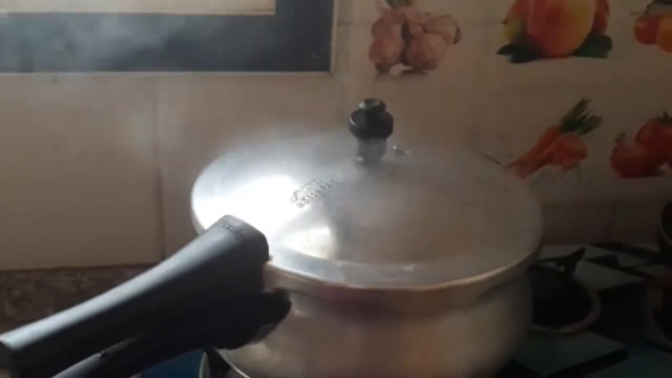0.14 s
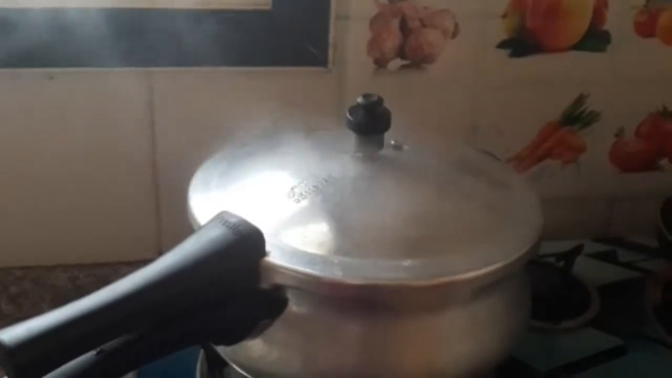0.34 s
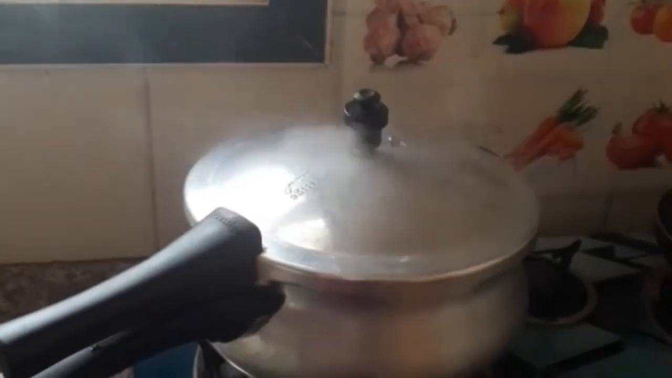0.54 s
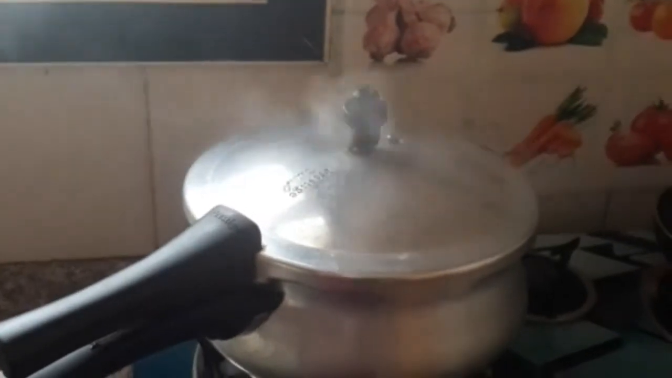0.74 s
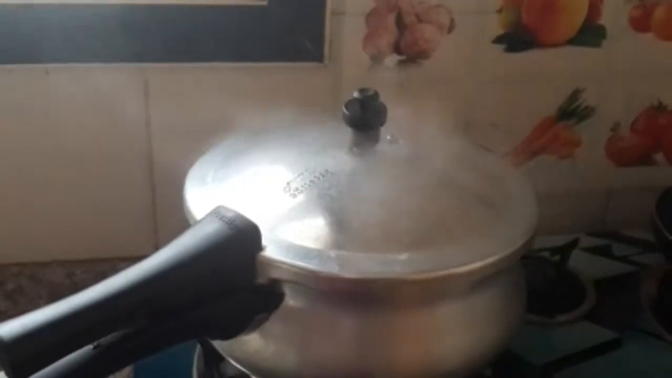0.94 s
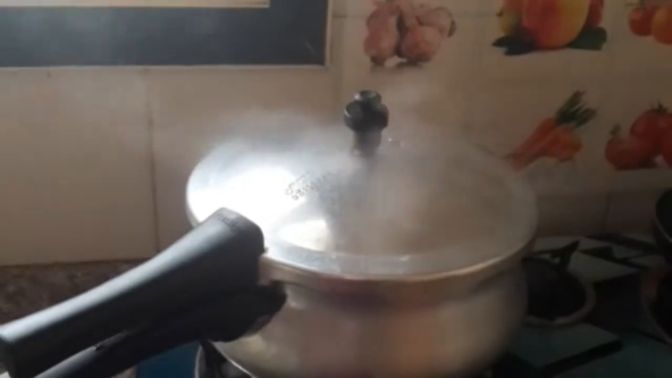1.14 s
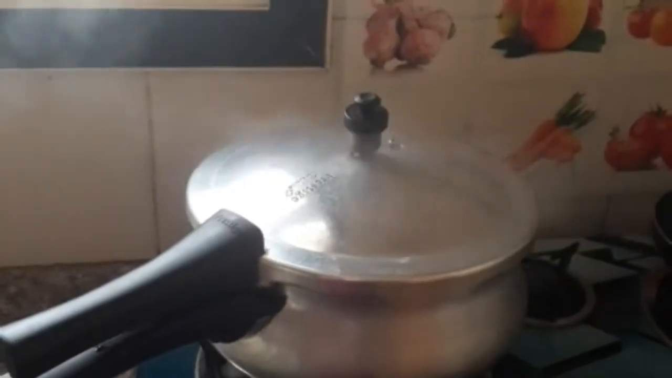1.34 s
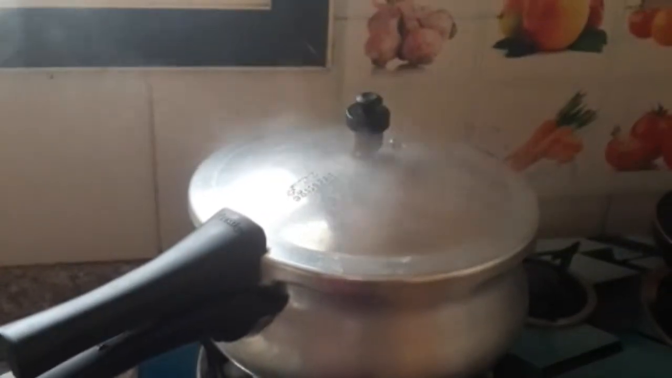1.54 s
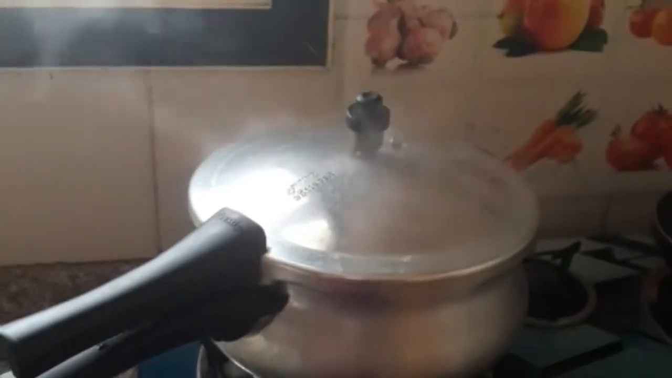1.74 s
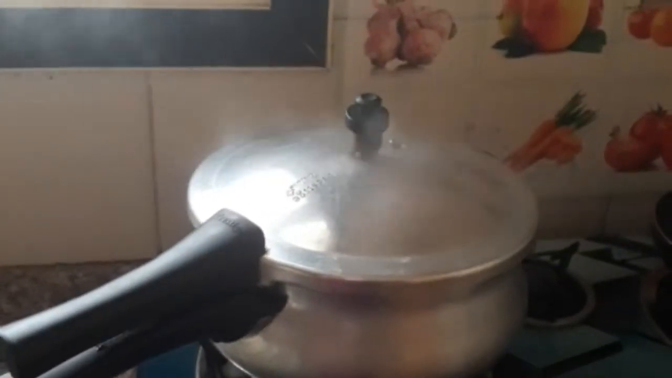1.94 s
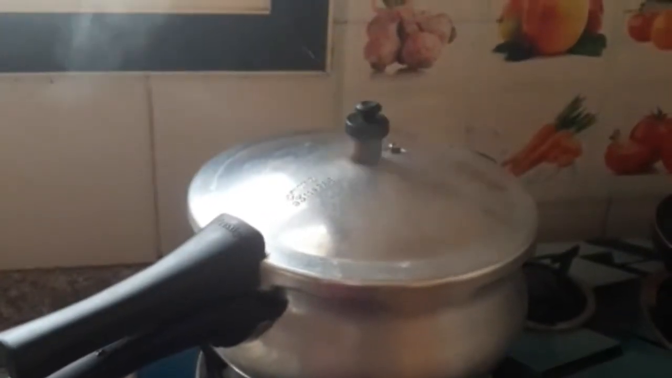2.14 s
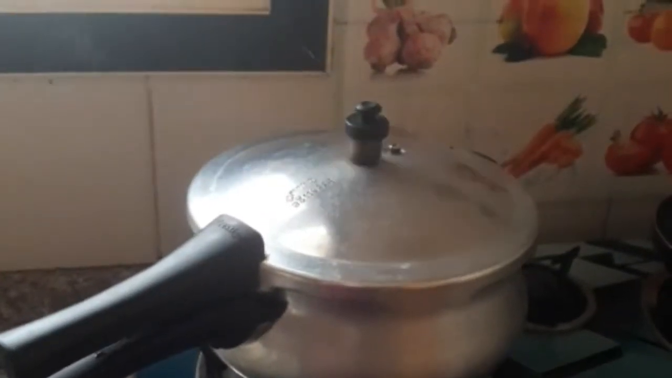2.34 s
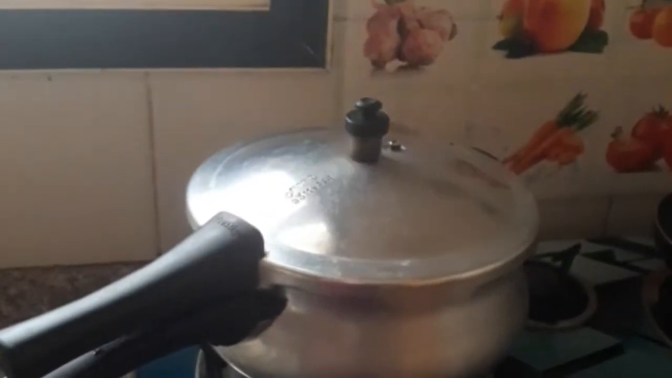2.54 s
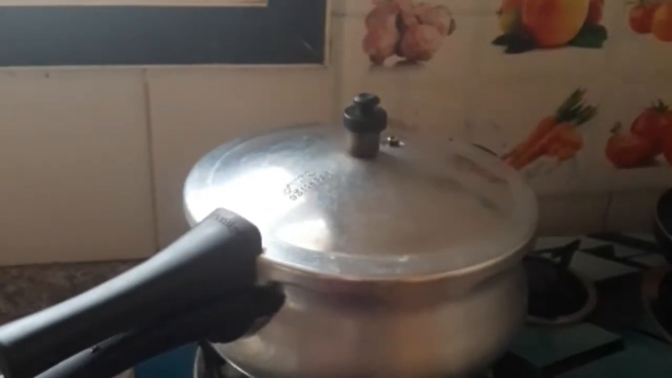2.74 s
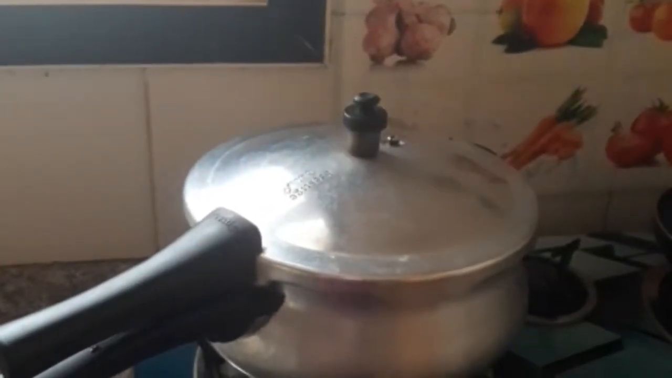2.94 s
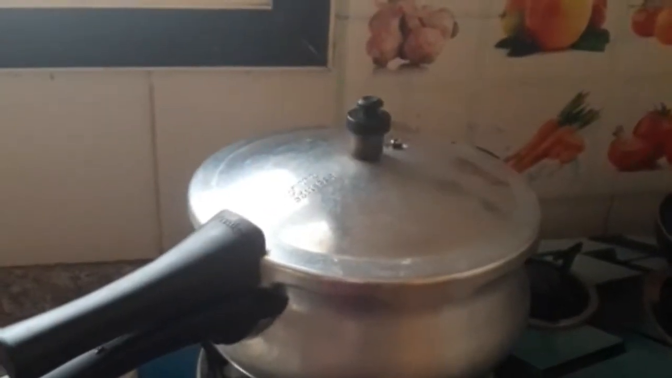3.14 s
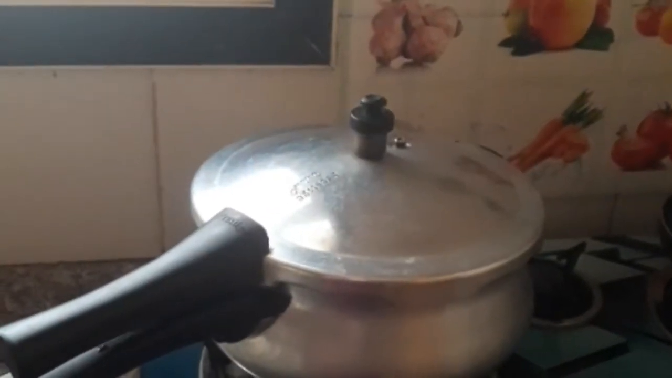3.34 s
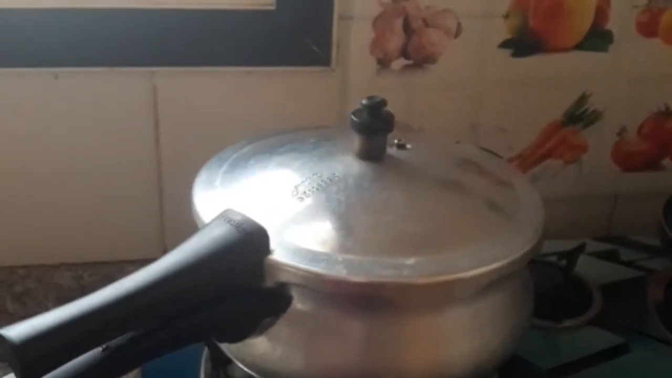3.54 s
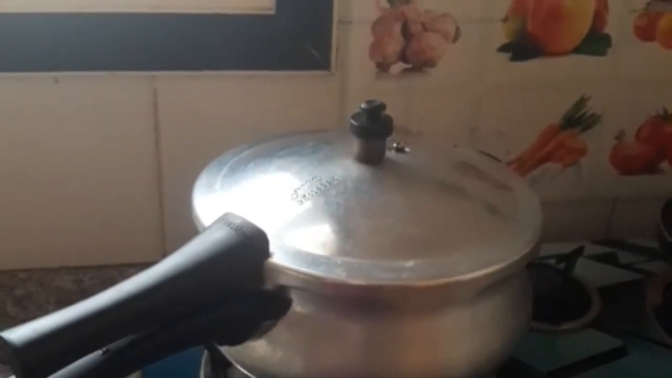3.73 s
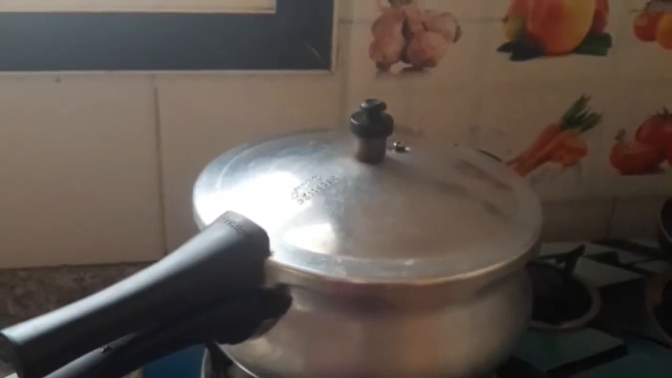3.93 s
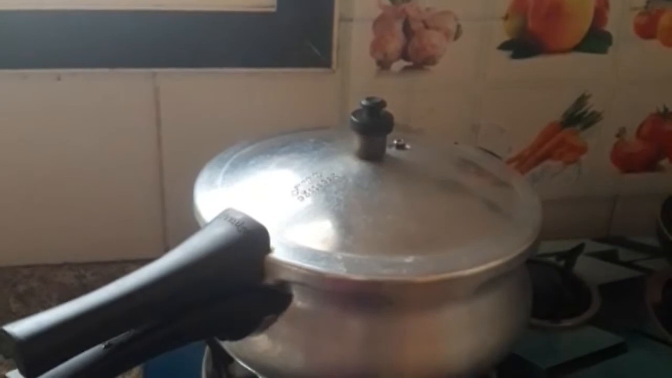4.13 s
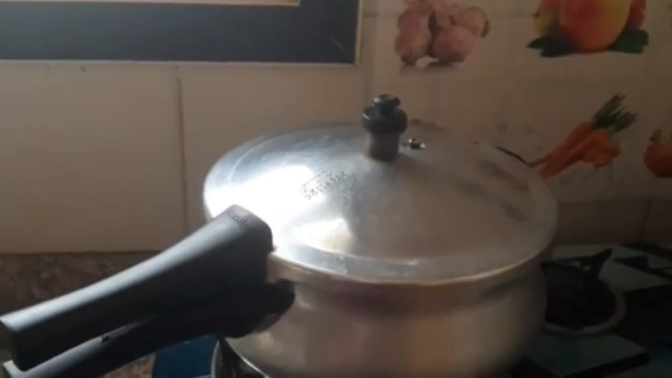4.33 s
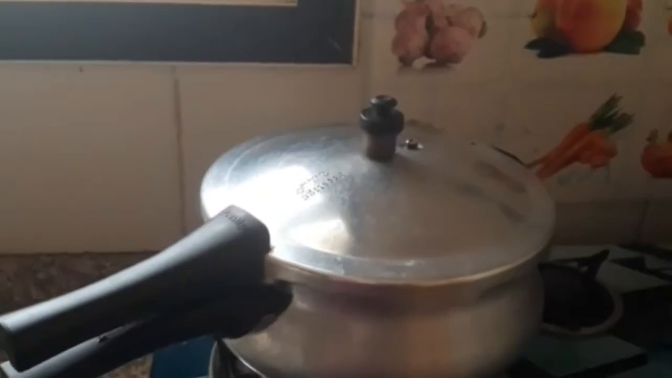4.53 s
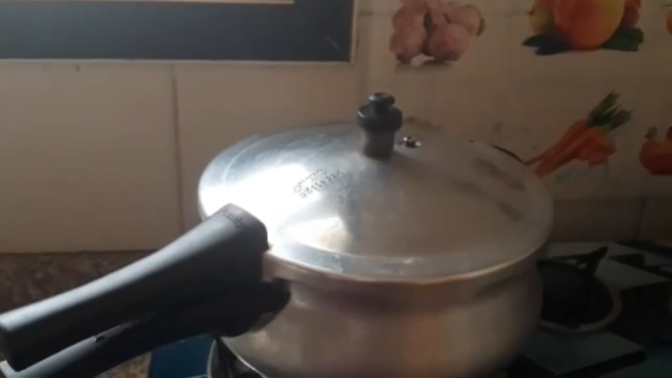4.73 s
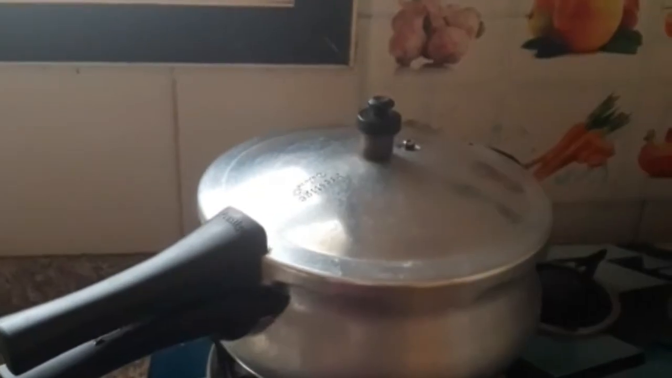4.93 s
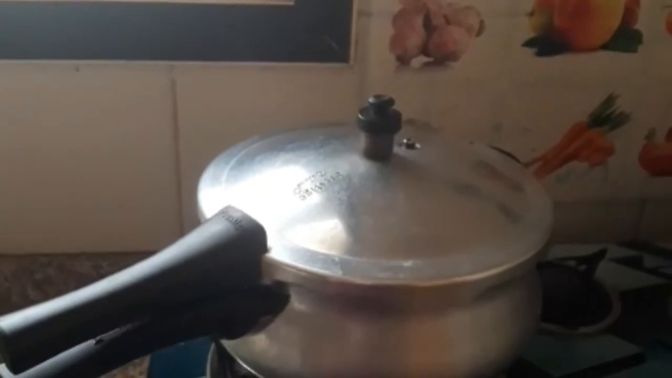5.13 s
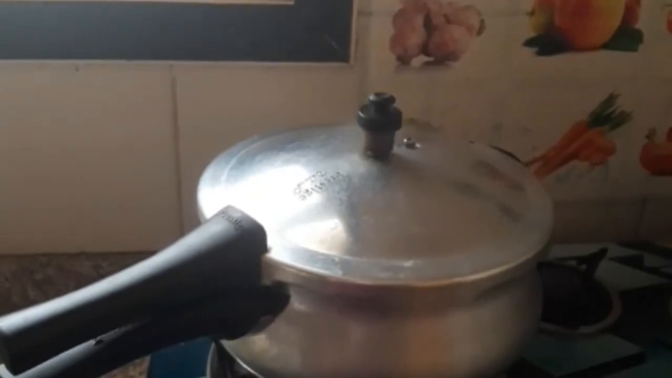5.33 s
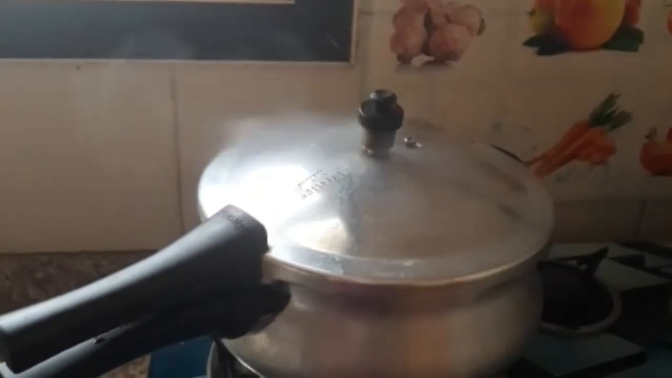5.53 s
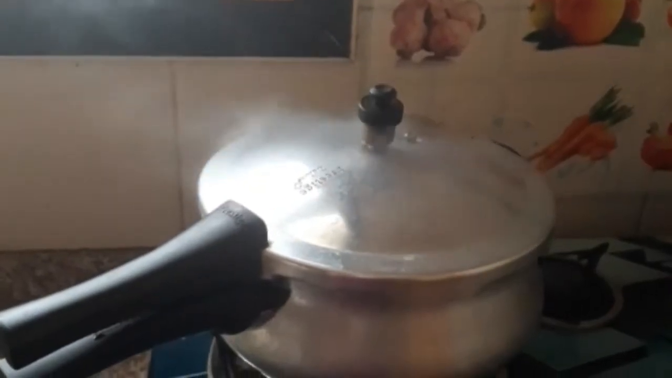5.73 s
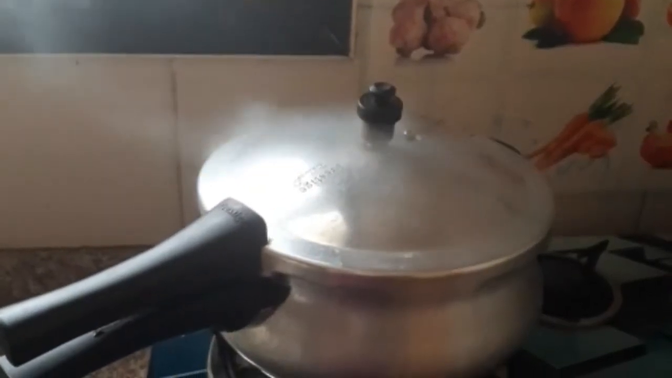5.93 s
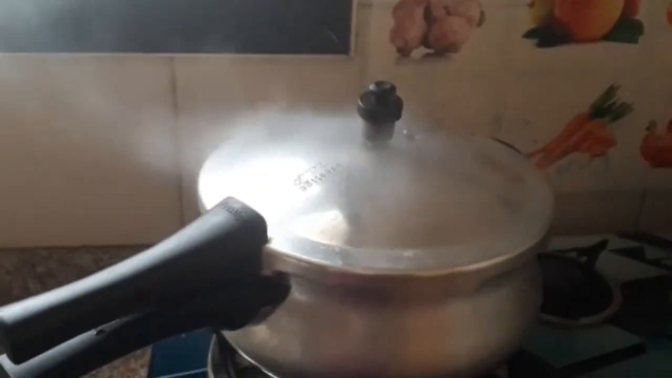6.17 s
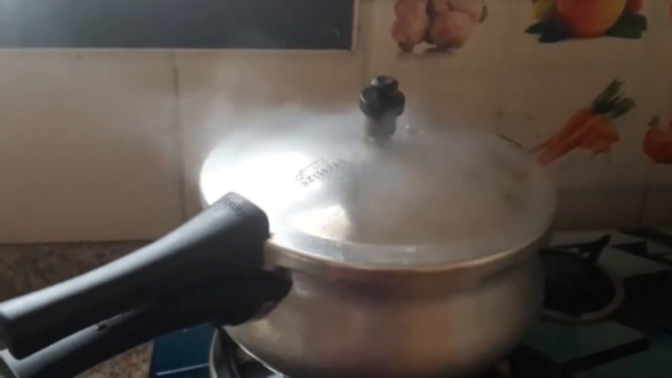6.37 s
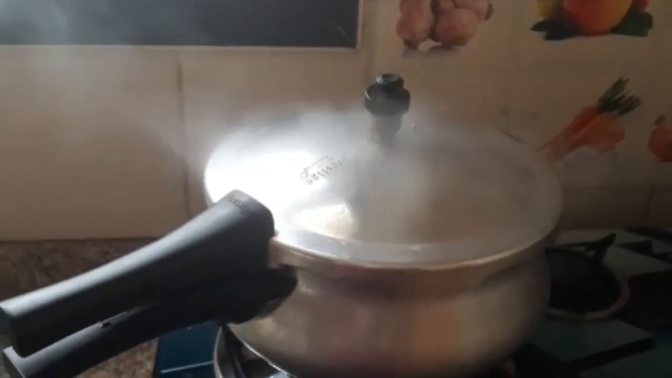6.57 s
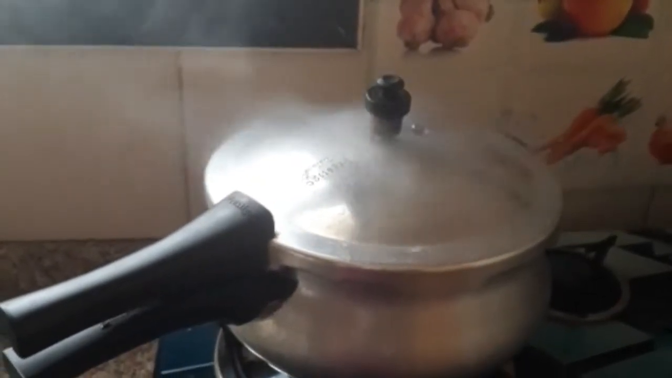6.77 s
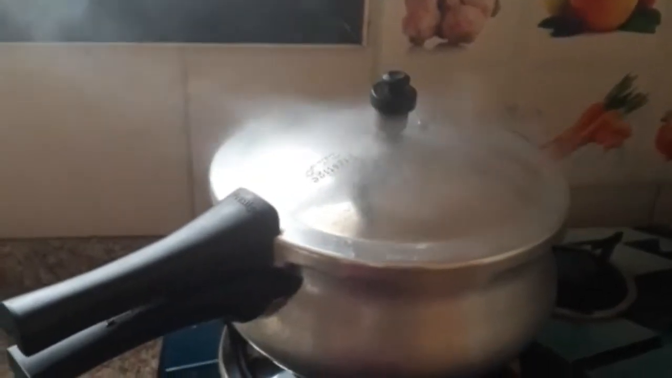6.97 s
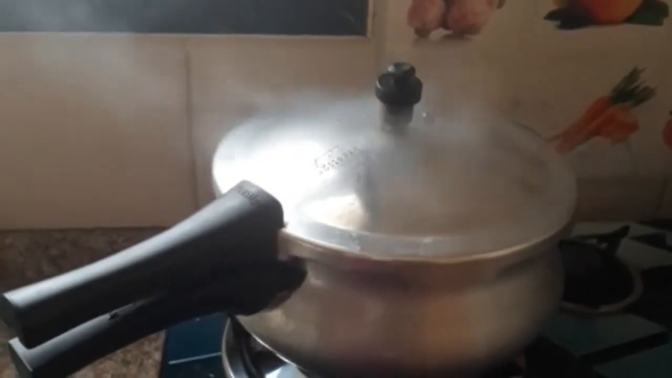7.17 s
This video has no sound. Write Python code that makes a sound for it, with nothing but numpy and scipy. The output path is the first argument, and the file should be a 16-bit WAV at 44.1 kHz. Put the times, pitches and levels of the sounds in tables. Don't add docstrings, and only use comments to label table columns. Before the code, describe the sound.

A pressure cooker roars steam in a harsh bright hiss, its weight clinks shut, a quiet simmer follows, then steam blasts out again.

```python
import sys
import numpy as np
from scipy import signal
from scipy.fft import rfft, irfft
from scipy.io import wavfile
from scipy.ndimage import uniform_filter1d

SR = 44100
rng = np.random.default_rng(int(sys.argv[2]) if len(sys.argv) > 2 else 0)


def wav_out(sig):
    wavfile.write(sys.argv[1], SR, np.round(np.clip(np.atleast_2d(sig).T, -1, 1) * 32767).astype(np.int16))


def linear_from_db(decibels):
    return 10 ** (np.asarray(decibels, float) / 20)


N = 317520
HZ = np.fft.rfftfreq(N, 1 / SR)
TIME = np.arange(N) / SR

# t/s, jet level/dB, lift/(0 seated to 1 raised)
BLOWS = [
    [(0, -22.5, 0.93), (.3, -24.5, 0.98), (1.1, -23, 0.96), (1.94, -23.5, 0.96), (2.03, -23.5, 0.92),
     (2.086, -25.5, 0.76), (2.152, -39.5, 0.35), (2.27, -68, 0.5)],
    [(4.33, -46.5, .3), (4.39, -46, .4), (4.45, -43, 0.6), (4.566, -48, 0.05), (4.742, -43, 0.8),
     (4.86, -46, 0.4), (5.0, -41.5, 0.87), (5.25, -43, .8), (5.3, -37.5, 0.4)],
    [(5.3, -42, 0.2), (5.357, -26, .15), (5.369, -27.5, 0.3), (5.375, -20.5, 0), (5.43, -22.5, 1),
     (5.47, -24, 0.85), (6.4, -24.5, .8), (7.2, -24.5, 0.93)],
]
# vent level/dB, weight level/dB, edge level/dB
MIXES = [
    [(-2, -17, -12.5), (1, 2.5, 3.5)],
    [(1, -4, -2), (7.5, -1.5, 5)],
    [(5.5, -1, 3), (-3, 4, 5.5)],
]
# f/Hz, level per Hz/dB
JET_SPECTRA = [
    [(410, -27.5), (700, -12), (1040, -16.5), (1520, -8.5), (1900, -6.5), (2260, -5.5), (2520, -7.5),
     (2940, -1), (3260, -3.5), (3930, 1.5), (4450, -2), (5400, -1.5), (7020, -42), (11900, -120)],
    [(500, -30), (900, -8), (1300, -12), (1700, 2.5), (2500, 1), (3300, 3.5), (4000, 1.5), (4700, -2),
     (5200, 2), (6800, -36)],
    [(410, -17), (700, -8), (1280, -14), (1750, -3), (2110, -7), (2280, -3.5), (2550, -3.5), (3260, -2.5),
     (3740, 0.5), (5000, -2.5), (5400, -2), (7020, -29), (11900, -120)],
]
# f/Hz, width/Hz, level/dB
VENT_MODES = [
    [(6060, 570, -6.5), (6100, 230, -10), (6370, 130, -7), (6600, 220, -9)],
    [(5630, 130, -2), (5600, 200, -4), (6000, 290, -5), (6070, 180, 2), (6440, 200, -8)],
    [(5780, 290, -4.5), (6130, 430, -7.5), (6330, 190, -7), (7070, 240, -8.5)],
]
# f/Hz, width/Hz, level/dB
WEIGHT_MODES = [
    [(8340, 120, -1), (8700, 170, 0), (8930, 130, -3), (9230, 180, -3.5)],
    [(8150, 420, -4), (8700, 170, -1)],
    [(8340, 130, 8.5), (8480, 180, 9), (8650, 150, 13), (9170, 164, 12)],
]
# f/Hz, level per Hz/dB
EDGE_SPECTRUM = [(4000, -17.5), (5000, -9.5), (7500, 2), (9500, -2), (10200, 2.5), (12800, 0), (13500, -1),
                 (15000, -2.5), (16500, -7.5)]
# rumble/dB, drift/(dB/s), warm body/dB, drift/(dB/s), low note/dB, drift/(dB/s)
PLUMES = [
    (-17, -0.7, -13, 1.13, -22, 2),
    (-15, -0.5, -13.5, 0.6, -18.5, 3),
]
# f/Hz, level per Hz/dB
RUMBLE_SPECTRUM = [(12, -30), (22, 0), (60, -2.5), (170, -1), (330, 0.5), (500, -0.5), (800, -19)]
# f/Hz, level per Hz/dB
BODY_SPECTRUM = [(200, -17), (350, -14.5), (500, -5), (900, -2.5), (1300, 0.5), (1900, -8), (3000, -52)]
# f/Hz, width/Hz, level/dB
NOTE_MODES = [(2110, 100, -2.9), (2258, 150, 0.77)]
# f/Hz, level/dB, t60/s
CLINK_MODES = [(2160, 0, .38), (2212, -2, .38), (2270, -7, .3), (3740, -5, .25), (4000, -5, .32)]
# t/s, peak level/dB, sign of the push, length/ms, rise/ms
PUFFS = [(5.4557, -18.5, 1, 2.4, .4), (5.4926, -16, 1, 1.6, 0.32), (5.529, -23, 1, 1.8, 0.4),
         (5.5662, -23, -1, 2.8, .45), (5.596, -23, 1, 1.8, .74), (5.639, -7, 1, 2.5, 0.31),
         (5.9124, -20, 1, 3, 0.5), (5.9297, -11, -1, 2.3, 0.32), (5.971, -17.5, 1, 2.6, 0.35),
         (6.142, -9, 1, 2.0, 0.11), (6.388, -12.5, 1, 3, 0.2), (6.407, -18, -1, 2.3, .33),
         (6.5058, -25, -1, 2.3, .4), (6.548, -19, 1, 2, 0.42)]
# f/Hz, level per Hz/dB
BURNER_SPECTRUM = [(530, -35), (900, -25), (956, -18), (1230, -1.5), (1770, 0), (1900, 0), (3190, -6),
                   (3910, 0), (4920, -8.5), (6030, -3), (7580, -9.5), (8550, -8), (9530, -9.5),
                   (13800, -12), (16000, -18)]
# f/Hz, width/Hz, level/dB
POT_MODES = [(1660, 420, -3), (3910, 53, 5), (3990, 61, 3), (5960, 450, 0), (7170, 120, -0.5),
             (8600, 430, -3)]
# f/Hz, level per Hz/dB
HOUSE_SPECTRUM = [(12, -37), (20, -11), (22, -35), (59, 2), (140, -5.5), (171, -7.5), (329, -2.5),
                  (460, -3.5), (1100, -8), (1430, -45), (2420, -120)]
# f/Hz, width/Hz, level/dB
HUM_MODES = [(232, 43, 4.5), (288, 34, 2.5), (461, 40, 0.5), (602, 17, 1.5)]
# f/Hz, t60/s
KITCHEN_T60 = [(500, 1), (1200, 0.51), (3000, 0.4), (8000, 0.32), (16000, 0.029)]
SPLIT_TIMES = [.076, .122, .215, .749, .958, 1.051, 1.33, 1.771, 2.537, 2.932, 3.234, 3.396, 3.837, 4.209,
               4.441, 5.602, 6.183, 6.229, 6.67]


def steam(table, mix, jet_spectrum, vent_modes, weight_modes):
    jet_db, lift = controls(table)
    vent_db, weight_db, edge_db = (seated + lift * (lifted - seated) for seated, lifted in zip(*mix))
    flutter_db = 0.34 * walk(180) + 0.22 * walk(25)

    jet = linear_from_db(0.5 * walk(9)) * colour(eddies(flutter_db, 0.17, 0.3, 250), jet_spectrum)
    vent = linear_from_db(vent_db + 0.5) * ring(eddies(flutter_db, 0.35, 0.95, 150), vent_modes)
    weight = linear_from_db(weight_db - 0.5) * ring(eddies(flutter_db, 0.26, 0.63, 200), weight_modes)
    edge = linear_from_db(edge_db + 2.0) * colour(eddies(flutter_db, 0.098, 0.47, 400), EDGE_SPECTRUM)

    blowing = gate(table[0][0], table[-1][0], 0.004)
    return blowing * linear_from_db(jet_db) * (jet + vent + weight + edge)


def roar(table, plume):
    linger_s, shut_db = 0.08, -80
    start, end = table[0][0], table[-1][0]
    jet_db, lift = controls(table)
    late_db, late_lift = controls(table, linger_s)
    late_db = np.where(TIME > start + linger_s, late_db, shut_db)
    late_db = np.maximum(jet_db, late_db)
    rumble_db, body_db, note_db = (db + drift * (TIME - start) for db, drift in np.reshape(plume, (3, 2)))

    rumble_db = jet_db + rumble_db - 5 * (1 - lift) + 2.0
    body_db = late_db + body_db + 1.5 * (1 - np.maximum(lift, late_lift)) - 2.5
    note_db = late_db + note_db + 3 * (1 - lift)

    rumble = linear_from_db(rumble_db) * colour(eddies(0, 0.66, 2.3, 60), RUMBLE_SPECTRUM)
    body = linear_from_db(body_db) * colour(eddies(0, 0.35, 1.0, 90), BODY_SPECTRUM)
    note = linear_from_db(note_db) * ring(eddies(0, 0.5, 0.88, 40), NOTE_MODES)
    return gate(start, end + linger_s, 0.02) * (rumble + body + note)


def clink():
    strike_s, strike_db, onset_s = 2.038, -28, 0.0068
    t = np.maximum(TIME - strike_s, 0)
    rings = sum(linear_from_db(db - 60 * t / t60) * np.sin(2 * np.pi * hz * t) for hz, db, t60 in CLINK_MODES)
    return linear_from_db(strike_db) * np.minimum(t / onset_s, 1) * rings


def puffs():
    out = np.zeros(N)
    ms = np.arange(-2, 14, 1000 / SR)
    for s, db, sign, length, rise in PUFFS:
        push = np.exp(-(ms / rise) ** 2)
        swing = np.exp(-((ms - 0.78 * length) / (0.61 * length)) ** 2)
        swing -= 0.25 * np.exp(-((ms - 2.7 * length) / (0.96 * length)) ** 2)
        balanced = push - swing * push.sum() / swing.sum()
        i = int((s - 0.002) * SR)
        out[i:i + len(ms)] += np.sign(sign) * linear_from_db(db) * balanced
    return out


def simmer():
    simmer_db, house_db, motor_hz = -47, -9.5, 167
    release_s, step_s, recover_s = 2.635, 0.076, 0.35
    since = np.maximum(TIME - release_s, 0)
    duck_db = (-7.5 + 2 * np.minimum(since / step_s, 1)) * np.exp(-since / recover_s)
    build_db = 2.5 * np.clip(TIME - 4.1, 0, 1)

    flame = linear_from_db(-1.0) * colour(eddies(0, 0.14, 0.78, 40), BURNER_SPECTRUM)
    pot = linear_from_db(-4.5) * ring(eddies(0, 0.35, 1.8, 40), POT_MODES)
    murmur = colour(eddies(0, 0.3, 0.33, 30), HOUSE_SPECTRUM)
    hum = linear_from_db(-3.5) * ring(eddies(0, 0.78, 0.4, 18), HUM_MODES)
    motor_level = linear_from_db(-8.5 + 2.0 * walk(8))
    motor = motor_level * np.sin(2 * np.pi * np.cumsum(motor_hz + 1.2 * walk(6)) / SR)
    return linear_from_db(simmer_db + duck_db + build_db) * (flame + pot + linear_from_db(house_db) * (murmur + hum + motor))


def kitchen(x, count=16):
    wet_db = -7
    hz, t60 = np.transpose(KITCHEN_T60)
    age = TIME[:SR]
    shares = [np.interp(np.log(HZ + 1), np.log(hz), row) for row in np.eye(len(hz))]
    place = TIME / TIME[-1] * count
    wet = 0
    for spot in range(count):
        away = np.abs((place - spot + count / 2) % count - count / 2)
        nearness = np.cos(np.pi / 2 * np.minimum(away, 1))
        decays = rng.standard_normal(SR) * linear_from_db(-60 * age / t60[:, None]) * (age > 0.004)
        tail = sum(share * rfft(unit(decay), N) for share, decay in zip(shares, decays)) / np.sqrt(SR)
        wet = wet + rfft(x * nearness) * tail
    return (x + linear_from_db(wet_db) * irfft(wet, N)) / np.sqrt(1 + linear_from_db(2 * wet_db))


def eddies(shared_db, slow_db, quick_db, quick_hz):
    return linear_from_db(shared_db + slow_db * walk(7) + quick_db * walk(quick_hz)) * rng.standard_normal(N)


def walk(rate):
    k = max(int(SR / rate), 1)
    held = np.repeat(rng.standard_normal(N // k + 1), k)
    slewed = uniform_filter1d(uniform_filter1d(held, k), k)
    return unit(slewed[:N])


def colour(x, points):
    hz, db = np.transpose(points)
    gain = linear_from_db(np.interp(np.log(HZ + 1), np.log(hz), db))
    return unit(irfft(rfft(x) * gain, N))


def ring(x, modes):
    power = sum(linear_from_db(2 * db) / (1 + ((HZ - hz) / width) ** 2) ** 2 for hz, width, db in modes)
    return unit(irfft(rfft(x) * np.sqrt(power), N))


def unit(x):
    return x / np.sqrt(np.mean(x ** 2))


def gate(start_s, end_s, fade_s):
    is_open = 1. * (TIME >= start_s) * (TIME <= end_s)
    return uniform_filter1d(is_open, int(fade_s * SR) + 1)


def controls(table, late_s=0):
    s, jet_db, lift = np.transpose(table)
    t = TIME - late_s
    return np.interp(t, s, jet_db), np.clip(np.interp(t, s, lift), 0, 1)


def scene():
    blows = sum(steam(*blow) for blow in zip(BLOWS, MIXES, JET_SPECTRA, VENT_MODES, WEIGHT_MODES))
    plumes = sum(roar(*blow) for blow in zip(BLOWS[::2], PLUMES))
    mono = kitchen(blows) + plumes + clink() + puffs() + simmer()
    return np.array([mono, mono])


def low_pass(x):
    return signal.sosfilt(signal.butter(12, 15740, fs=SR, output="sos"), x)


def record(dry):
    top_hz, second_band_share, band_width = 15740, 0.6, 0.17
    stranger = rfft(np.roll(dry[0], 700))
    side = np.zeros(N)
    for s, (first, second, chance) in zip(SPLIT_TIMES, rng.random((len(SPLIT_TIMES), 3))):
        fade = np.cos(np.pi / 2 * np.clip((TIME - s) * SR / 1024, -1, 1)) ** 2
        places = [first, second] if chance < second_band_share else [first]
        lows_hz = np.interp(places, [0, 1], (4200, 13500))
        bands = np.any([(HZ > hz) * (HZ < hz * (1 + band_width)) for hz in lows_hz], axis=0)
        side += fade * irfft(stranger * bands, N)
    trace = linear_from_db(-84) * ring(rng.standard_normal(N), [(450, 500, 0)]) * gate(2.24, 5.3, 0)
    both = dry + (linear_from_db(-0.5) * side + trace) * np.array([[1], [-1]])
    mix = irfft(rfft(both) * (HZ < top_hz), N)
    return low_pass(mix)


dry = scene()
out = record(dry)
wav_out(out)
```